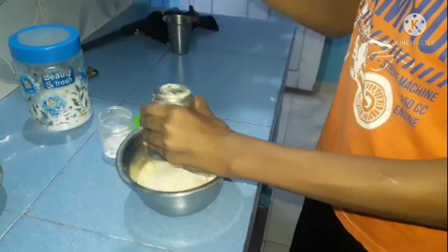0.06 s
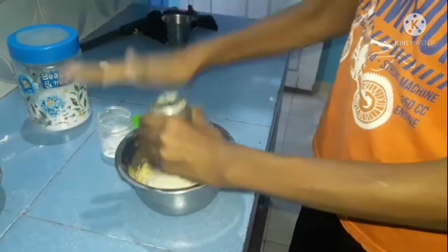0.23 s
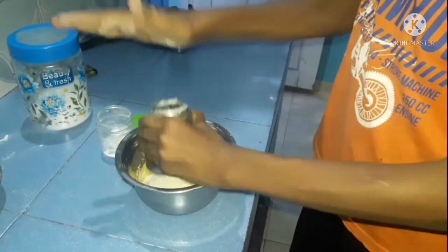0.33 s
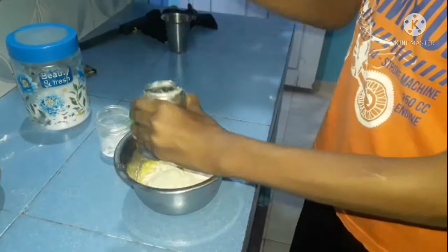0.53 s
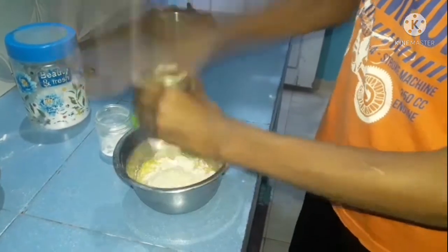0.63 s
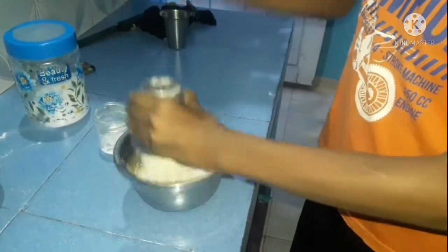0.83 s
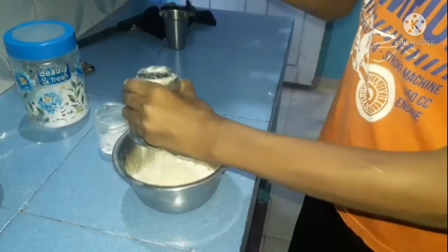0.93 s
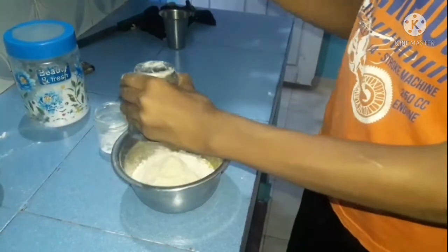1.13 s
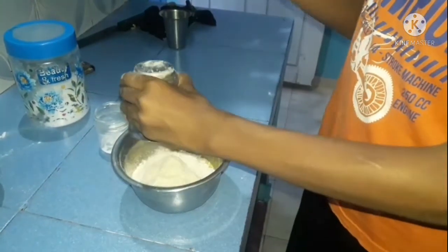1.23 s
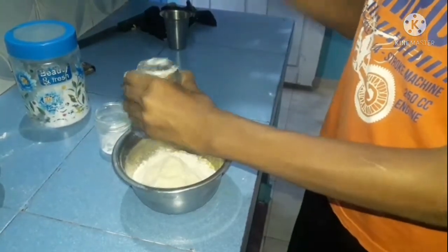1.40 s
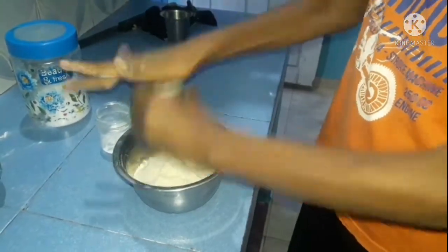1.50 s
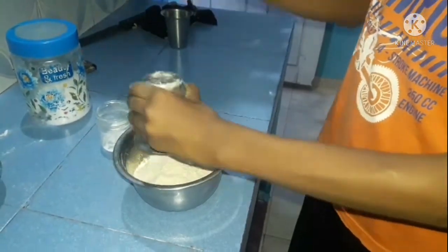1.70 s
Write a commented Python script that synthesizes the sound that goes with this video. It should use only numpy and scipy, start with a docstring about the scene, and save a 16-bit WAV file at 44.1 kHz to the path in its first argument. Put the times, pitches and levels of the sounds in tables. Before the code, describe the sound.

Palm slaps on the base of an upturned steel tumbler held over a metal bowl, kitchen

```python
"""Three palm slaps, each softer than the last, with bowl ticks, scrapes and a thin wavering 2.7 kHz tone
before and between them. The palm hits the base of an upturned steel tumbler held over a bowl on a tiled
counter, close to a phone. Each slap is a contact-noise crack, a tone-burst thump and briefly ringing steel
modes; a small hard kitchen echoes it. The bowl rattles (smeared clicks, rim modes, knocks) and shuffles
(uneven noise). Steady air noise lies beneath."""
import sys
import numpy as np
from scipy import signal
from scipy.fft import rfft, irfft, next_fast_len
from scipy.io import wavfile
from scipy.ndimage import uniform_filter1d

SR = 44100
rng = np.random.default_rng(int(sys.argv[2]) if len(sys.argv) > 2 else 0)


def decibels_to_gain(level_db):
    """Convert a level in decibels to a linear amplitude gain (20 dB per decade)."""
    exponent = np.asarray(level_db, float) / 20
    return 10 ** exponent


def store_wav(level_fs):
    """Save 16-bit WAV to argv[1]."""
    pcm = np.round(np.clip(np.atleast_2d(level_fs), -1, 1) * 32767)
    wavfile.write(sys.argv[1], SR, pcm.T.astype(np.int16))


N = 77175

# low resonances of counter and kitchen: mode_hz, gain_db, t60_s
BOOM_MODES = [(117.2, -6.5, 0.68), (152, -0.5, 0.21), (210, -2.5, 0.2), (327.5, -4.5, 0.12),
              (410.7, -9.5, 0.12), (454, -2, 0.15), (487.7, -4, 0.33), (563.6, -2.5, .4), (809, -21, .15),
              (1000, -12, .12)]
BOOM_DB = -37
THUMP_WIDTH = 0.79  # bandwidth / pitch of thumps and knocks


def curve(rows):
    """Gain over time, interpolated in dB from (s, dB) rows."""
    times_s, levels_db = np.array(rows).T
    return decibels_to_gain(np.interp(np.arange(N) / SR, times_s, levels_db))


def response(points, size):
    """Gain at each FFT bin, interpolated over log frequency from (Hz, dB) points."""
    hz, db = np.array(points).T
    bins_hz = np.arange(size // 2 + 1) * SR / size
    return decibels_to_gain(np.interp(np.log(bins_hz + 1), np.log(hz), db))


def noise(points):
    """Gaussian noise coloured by (Hz, dB) points, rms 1."""
    x = irfft(rfft(rng.standard_normal(N)) * response(points, N), N)
    return x / np.std(x)


def ring(x, modes):
    """Excites damped sine modes (Hz, dB, t60 s), each starting at its gain for a unit click."""
    t = np.arange(SR) / SR
    tail = 0
    for hz, db, t60_s in modes:
        tail = tail + decibels_to_gain(db) * np.sin(2 * np.pi * hz * t) * 1000. ** (-t / t60_s)
    return signal.fftconvolve(x, tail)[:N]


def click(start_s, level_db):
    """One impulse."""
    x = np.zeros(N)
    x[int(start_s * SR)] = decibels_to_gain(level_db)
    return x


def pop(start_s, level_db, pitch_hz, width_hz):
    """Sine burst with sudden onset; bandwidth sets its exponential decay."""
    t = np.maximum(np.arange(N) / SR - start_s, 0)
    return decibels_to_gain(level_db) * np.sin(2 * np.pi * pitch_hz * t) * np.exp(-np.pi * width_hz * t)


def clang(peak_s, level_db, pitch_hz, length_s):
    """Tone burst that swells and fades under a Gaussian envelope."""
    t = np.arange(N) / SR - peak_s
    return decibels_to_gain(level_db) * np.cos(2 * np.pi * pitch_hz * t) * np.exp(-.5 * (t / length_s) ** 2)


def crack(x, lead_s, swell_s, fade_s):
    """Smears impulses into a white spatter of tiny contacts peaking on each impulse, bass removed."""
    low_cut_hz = 1020
    t = (np.arange(1024) - 512) / SR
    swell = np.exp(t / swell_s) * (t > -lead_s)
    fade = np.exp(-np.abs(t) / fade_s)
    shape = np.where(t < 0, swell, fade)
    grain = rng.standard_normal(len(t))
    for _ in range(6):  # whiten, keeping the shape
        spectrum = rfft(grain * shape)
        grain = irfft(spectrum / np.abs(spectrum)) / np.maximum(shape, .01)
        grain = np.clip(grain / np.std(grain[400:600]), -2.5, 2.5)
    burst = grain * shape
    burst = burst / np.linalg.norm(burst)
    x = signal.fftconvolve(x, burst)[512:512 + N]
    return signal.lfilter(*signal.butter(2, low_cut_hz, "high", fs=SR), x)


def air():
    """Steady coloured noise."""
    # pitch_hz, density_db (per Hz, relative)
    air_colour = [(18, -46), (30, -23.5), (109, 10), (189, -10.5), (259, -5.5), (415, -13), (801, -21),
                  (962, -37.5), (1250, -36.5), (1590, -26.5), (2060, -14.5), (2290, -19), (4300, -7.5),
                  (6210, -31), (16000, -32)]
    rms_db = -61.5
    return decibels_to_gain(rms_db) * noise(air_colour)


def tone():
    """Narrow-band noise heard as a thin tone: random wavering plus a regular throb."""
    # time_s, level_db (before the throb)
    tone_levels = [(0, -49.5), (.08, -66), (.15, -64), (.2, -52.5), (.3, -77), (1.05, -89.5), (1.08, -56),
                   (1.115, -51.5), (1.22, -60), (1.3, -69), (1.33, -70), (1.75, -81.5)]
    hz, width_hz = 2709, 35
    throb_hz, throb_peak_s, throb_depth = 22.5, 1.117, .6
    t = np.arange(N) / SR
    throb = 1 + throb_depth * np.cos(2 * np.pi * throb_hz * (t - throb_peak_s))
    band = [(hz - 8 * width_hz, -60), (hz - width_hz, -8), (hz, 0),
            (hz + width_hz, -8), (hz + 8 * width_hz, -60)]
    return throb * curve(tone_levels) * noise(band)


def kitchen(x):
    """Direct sound, a few near echoes and a dense noise tail with its own decay time in each band."""
    # nearest surfaces: delay_s, level_db
    near_echoes = [(.0059, -4), (0.0101, -19), (.0185, -11.5)]
    # reverberation: band_hz, t60_s
    room_decay = [(150, 0.51), (500, 0.52), (1500, 0.32), (4000, 0.35), (10000, .29), (15000, 0.19)]
    tail_db, build_s = -25.5, 0.002
    t = np.arange(SR) / SR
    spectrum = rfft(rng.standard_normal(SR))
    log_hz = np.log(np.arange(SR // 2 + 1) + 1.)
    centres = np.log([band_hz for band_hz, _ in room_decay])
    tail = 0
    for k, (_, t60_s) in enumerate(room_decay):
        share = np.interp(log_hz, centres, np.arange(len(centres)) == k)  # overlapping bands
        tail = tail + irfft(spectrum * share, SR) * 1000. ** (-t / t60_s)
    impulse = decibels_to_gain(tail_db) * tail * (1 - np.exp(-t / build_s))
    impulse[0] = 1  # direct sound
    for delay_s, level_db in near_echoes:
        impulse[int(delay_s * SR)] += decibels_to_gain(level_db)
    return signal.fftconvolve(x, impulse)[:N]


def shuffle():
    """Bowl dragging on tiles: coloured noise whose level wanders in random steps, smoothed."""
    # time_s, level_db (before the unevenness)
    drag_levels = [(0, -50), (.05, -48), (.1, -43.5), (.15, -48), (.2, -59.5), (.4, -59.5), (.8, -98),
                   (.85, -44), (.94, -47), (1.0, -48.5), (1.1, -65), (1.25, -75.5), (1.75, -76)]
    # pitch_hz, relative_db
    drag_colour = [(60, -20.5), (120, 6.5), (300, -11), (800, -10), (1500, -20), (2800, -8.5),
                   (5000, -29.5), (12000, -33.5)]
    grain_hz, grain_db = 151.6, 3
    hold = int(SR / grain_hz)
    steps = np.repeat(rng.standard_normal(N // 100), hold)[:N]
    steps = uniform_filter1d(steps, hold // 2)
    return curve(drag_levels) * decibels_to_gain(grain_db * steps) * noise(drag_colour)


def ticks():
    """Rocking bowl: smeared clicks, damped rim modes and dull knocks of its foot on the tiles."""
    # start_s, click_db, rim_db
    tick_events = [(.0075, -34.5, -39), (0.016, -41.5, -41), (.023, -42, -41.5), (0.047, -52, -38.5),
                   (.075, -61, -76), (.091, -34, -45.5), (0.099, -41, -47), (0.117, -56, -53.5),
                   (0.722, -58, -34), (0.749, -53, -34), (.838, -14, -31.5), (.845, -20.5, -61),
                   (.857, -26.5, -39), (0.872, -56, -40), (0.889, -37, -39), (0.9159, -26, -40),
                   (0.924, -30.5, -63), (1.042, -40.5, -56), (1.137, -42, -75.5), (1.143, -64, -90.5),
                   (1.255, -51.5, -69.5)]
    # bowl rim, damped by its contents: mode_hz, gain_db, t60_s
    rim_modes = [(2745, 0, .014), (2110, -14, .015)]
    # bowl foot on tiles: start_s, level_db, pitch_hz
    foot_knocks = [(.005, -36.5, 102), (.098, -39, 773), (0.101, -36.5, 290), (0.837, -31, 310),
                   (.905, -26.5, 125), (.935, -34.5, 203), (0.999, -34.5, 71), (1.12, -42.5, 65)]
    smear_s, top_hz = 0.00072, 7150
    near_db = 2.5  # extra direct sound: the bowl faces the phone
    clicks = sum(crack(click(s, click_db), smear_s, smear_s, smear_s) for s, click_db, _ in tick_events)
    clicks = signal.lfilter(*signal.butter(1, top_hz, fs=SR), clicks)
    rim = ring(sum(click(s, rim_db) for s, _, rim_db in tick_events), rim_modes)
    bright = clicks + rim
    low = sum(pop(s, db, hz, THUMP_WIDTH * hz) for s, db, hz in foot_knocks)
    return decibels_to_gain(near_db) * bright + kitchen(bright + low) + decibels_to_gain(BOOM_DB) * ring(low, BOOM_MODES)


def slap(hit_s, crack_db, clang_db, thump_db, thump_hz, cup_db, cup_hz):
    """One palm blow in the room: skin, damped tumbler wall, its modes, thump and air under the palm."""
    # tumbler: mode_hz, gain_db, t60_s
    steel_modes = [(2100, -26.5, .04), (3040, -12.5, .03), (2998, -2.5, 0.029), (3290, -9.5, .04),
                   (3700, -14.5, 0.021), (4124, -20.5, 0.053), (4060, -20.5, 0.058), (4840, -32.5, 0.052),
                   (4880, -23.5, .04), (5140, -20, 0.045)]
    touch_lead_s = .0028
    swell_s, fade_s = .002, .0015  # contact swells from first finger to palm, then fades
    jar_hz, jar_s = 5000, .0001
    jar_db, jar_full_hz = -6.5, 310  # level over the thump, reached at this thump pitch
    wall_hz, wall_s, steel_db, cup_s = 3007, 0.00027, -14, 0.001
    near_db = 1.5  # extra direct sound of wall, modes, thump and cupped air

    skin = crack(click(hit_s, crack_db), touch_lead_s, swell_s, fade_s)
    # a stiff thump also jars the tumbler against the bowl
    jar = thump_hz / jar_full_hz * clang(hit_s, thump_db + jar_db, jar_hz, jar_s)
    wall = clang(hit_s, clang_db, wall_hz, wall_s)
    steel = wall + ring(click(hit_s, clang_db + steel_db), steel_modes)
    thump = pop(hit_s - touch_lead_s / 2, thump_db, thump_hz, THUMP_WIDTH * thump_hz)
    low = thump + clang(hit_s, cup_db, cup_hz, cup_s)
    in_room = kitchen(skin + jar + steel + low)
    return in_room + decibels_to_gain(near_db) * (steel + low) + decibels_to_gain(BOOM_DB) * ring(low, BOOM_MODES)


def microphone(x):
    """Phone microphone colour as a causal minimum-phase filter, from the folded cepstrum."""
    # pitch_hz, gain_db
    mic_response = [(30, -37), (90, -12), (300, 3.5), (900, 2.5), (1250, 1.5), (1650, 7.5), (2100, -0.5),
                    (2700, 0), (3500, -0.5), (4300, 12.5), (5300, 14), (6500, 4), (7800, -8.5),
                    (10500, 2.5), (12500, -2), (15200, -4), (15800, -29)]
    size = next_fast_len(N + SR)
    cepstrum = irfft(np.log(response(mic_response, size)), size)
    cepstrum[1:size // 2] *= 2
    cepstrum[size // 2 + 1:] = 0
    return irfft(rfft(x, size) * np.exp(rfft(cepstrum)), size)[:N]


def scene():
    """Slaps, ticks and shuffle through the microphone, plus tone and air added directly; mono."""
    # hit_s, crack_db, clang_db, thump_db, thump_hz, cup_db (cupped air), cup_hz
    slap_events = [(0.2075, 2.5, -17.5, -12, 310, -20, 722), (.6803, -7, -17.5, -16.5, 153, -73, 890),
                   (1.5115, -17, -22.5, -44, 299, -37.5, 980)]
    near = sum(slap(*row) for row in slap_events) + ticks() + shuffle()
    return (microphone(near) + tone() + air())[None]


def roll_off(x):
    """The treble ends steeply here."""
    return signal.sosfilt(signal.butter(12, 17160, fs=SR, output="sos"), x)


def record(dry):
    """The finished mix as the phone stores it."""
    return roll_off(dry)


dry = scene()
out = record(dry)
store_wav(out)
```